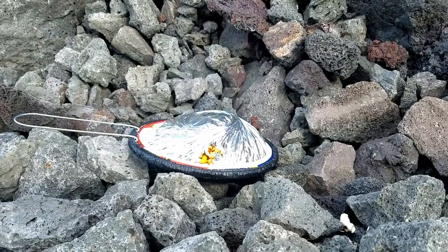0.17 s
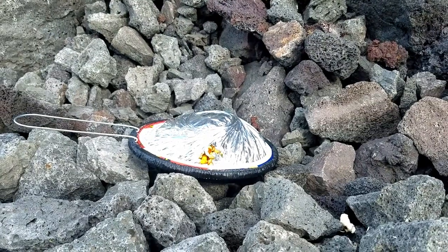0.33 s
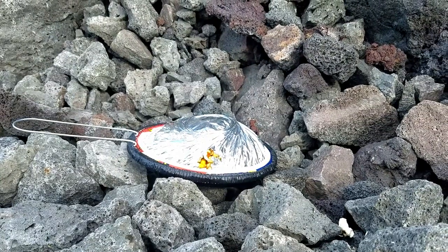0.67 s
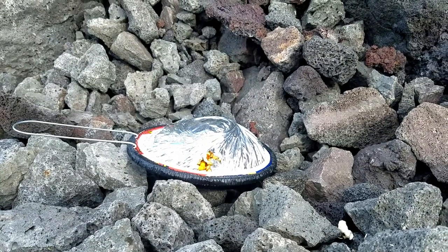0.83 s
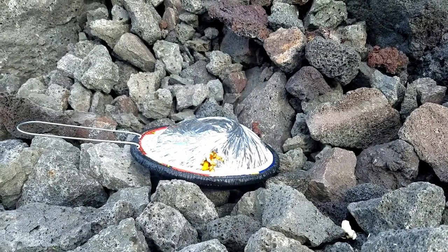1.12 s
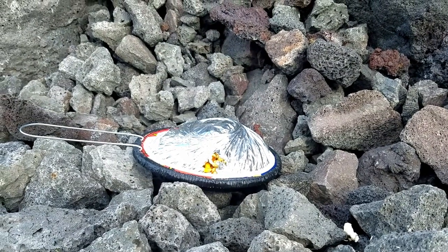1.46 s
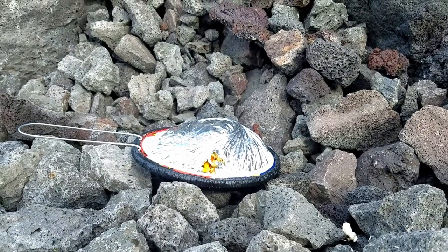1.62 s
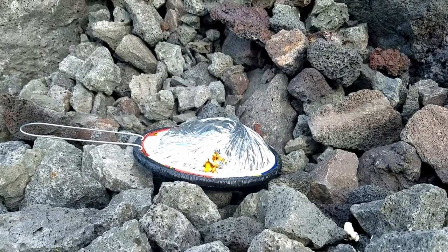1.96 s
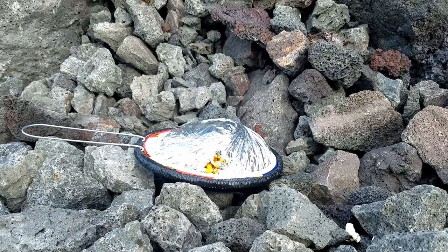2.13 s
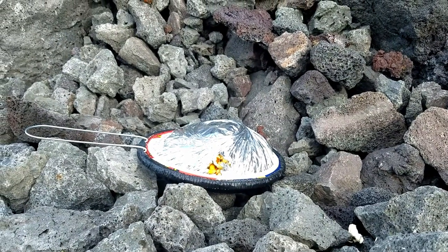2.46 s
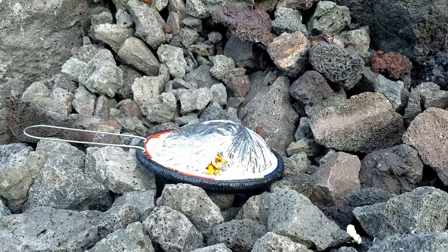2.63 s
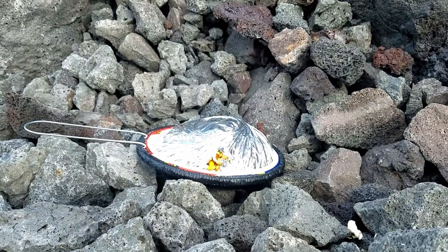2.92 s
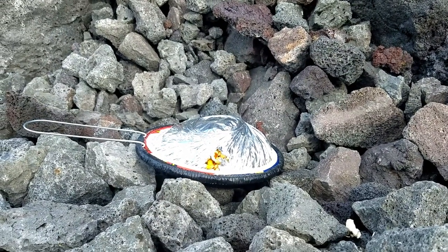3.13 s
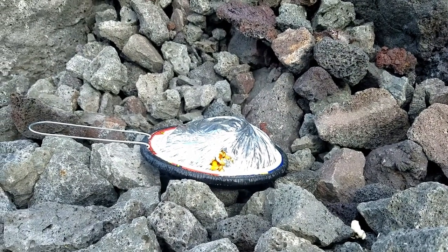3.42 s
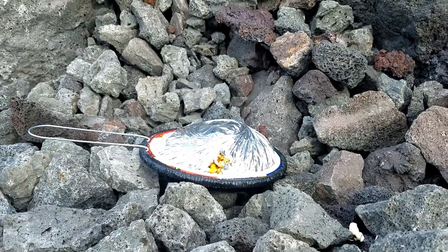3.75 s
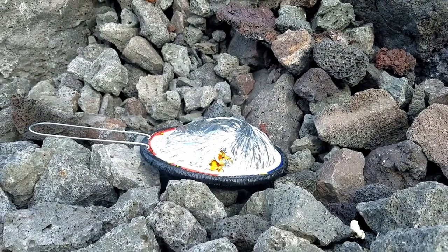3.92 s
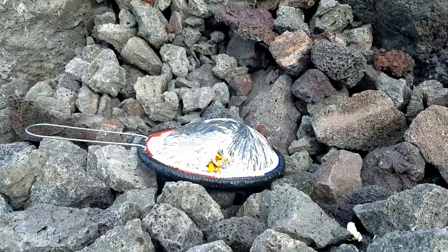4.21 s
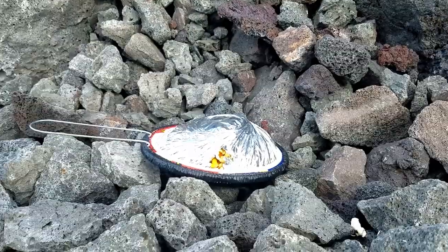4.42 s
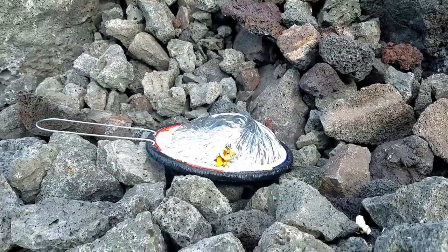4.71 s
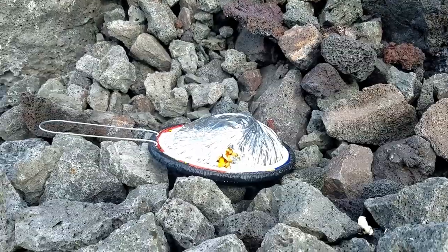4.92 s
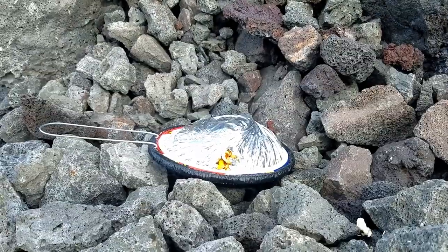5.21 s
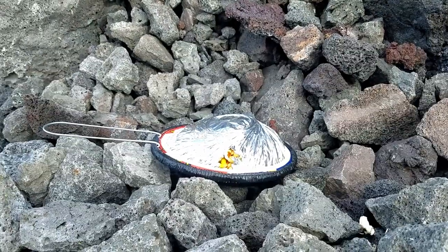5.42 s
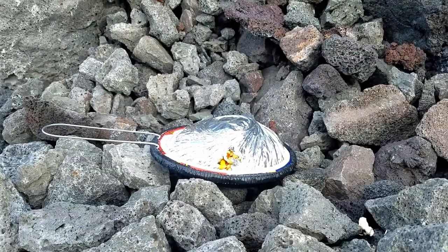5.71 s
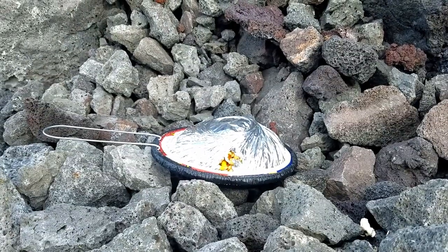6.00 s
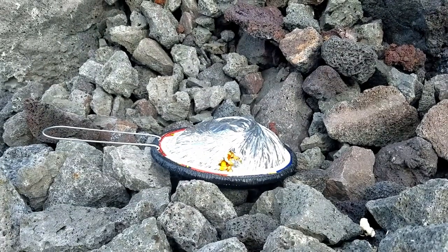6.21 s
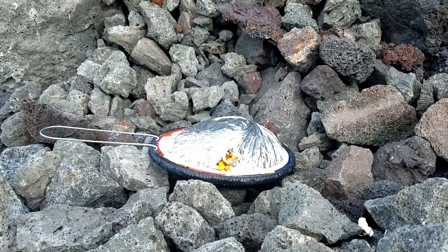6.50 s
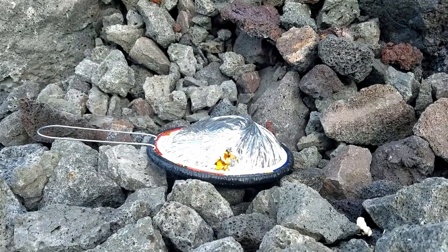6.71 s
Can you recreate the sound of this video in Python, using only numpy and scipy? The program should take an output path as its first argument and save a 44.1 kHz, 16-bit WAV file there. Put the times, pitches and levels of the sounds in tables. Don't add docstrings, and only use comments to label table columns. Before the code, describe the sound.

A foil-covered popcorn pan sits on rocks outdoors. After a quiet second of hiss and faint ticks, a soft pop comes, then a weaker one, then a loud double burst with a long rattle of kernels. Smaller pops follow, a long pause with tiny ticks, then two firm pops and a last one near the end. Close stereo microphone, light uneven wind on it.

```python
import sys
import numpy as np
from scipy import signal
from scipy.fft import rfft, irfft
from scipy.io import wavfile
from scipy.ndimage import uniform_filter1d

SR = 44100
rng = np.random.default_rng(int(sys.argv[2]) if len(sys.argv) > 2 else 0)


def undo_db(level):
    steps = np.asarray(level, float) / 20
    return 10 ** steps


def dump(signal):
    limited = np.clip(np.atleast_2d(signal).T, -1, 1)
    pcm = np.round(limited * 32767).astype(np.int16)
    wavfile.write(sys.argv[1], SR, pcm)


N = 302967

TOP_HZ = 15780
TICK_HZ = 1200
CHANCE_SPREAD_DB = 15

# start_s, level_db, left_right_db
BREEZE = [(0, -70.5, 0), (.15, -60.5, -4), (.7, -70, -12.5), (1.05, -66.5, -3.5), (1.45, -58.5, -10.5),
          (1.9, -67, -8.5), (2.45, -67, -5.5), (3.35, -69.5, -1), (4.2, -65.5, -2), (4.75, -62.5, 0),
          (5.1, -69, 4), (5.55, -58.5, 13.5), (5.85, -63.5, -3), (6.15, -59, 20.5), (6.5, -58, 0.5),
          (6.87, -66, 14.5)]
# start_s, strength_db
SHIFTS = [(0.1462, -44.5), (0.636, -40.5), (1.6563, -48), (1.7334, -40.5), (1.8701, -43), (2.051, -40),
          (2.2268, -42), (2.8095, -41), (2.9333, -39.5), (2.9675, -38), (3.1128, -50.2), (3.2801, -46),
          (3.4203, -43), (3.5506, -47.5), (3.686, -43), (4.1779, -43.2), (4.766, -40), (5.6568, -39),
          (6.3912, -51.2), (6.5855, -38), (6.615, -49)]
# start_s, level_db, t60_s, pitch_hz
PATTER = [
    (.98, -47.5, 0.16, 1310),
    (1.26, -51.5, 0.2, 1390),
    (1.475, -50, 0.65, 1740),
    (2.41, -51.5, 0.21, 1310),
    (2.814, -49, 0.2, 1900),
    (4.814, -59, 0.081, 1500),
    (4.92, -48.5, 0.32, 1190),
    (5.676, -52.5, 0.22, 1980),
    (6.51, -51, 0.27, 990),
]


def evened(x):
    return x / np.sqrt(np.mean(x ** 2) + 1e-20)


def peaked(x):
    return x / abs(x).max()


def read(points, hz):
    f, value = np.transpose(points)
    return np.interp(np.log(hz + 1), np.log(f + 1), value)


def add(mix, s, sound, pan_db):
    part = mix[:, max(round(s * SR), 0):][:, :sound.shape[1]]
    part += sound[:, :part.shape[1]] * undo_db(np.array([[pan_db / 2], [-pan_db / 2]]))


def pair(noise, same):
    same = np.clip(same, -1, 1)
    return np.array([noise[0], same * noise[0] + np.sqrt(1 - same ** 2) * noise[1]])


def coloured(x, db):
    return irfft(rfft(x) * undo_db(db), x.shape[-1])


def burst(t, rise, t60):
    shape = (1 - np.exp(-(t / rise) ** 2)) * undo_db(-60 * t / t60)
    return shape / shape.max()


def field(points_db):
    z = rng.standard_normal((points_db.shape[-1], points_db.shape[-2], 4)).T
    z = (z[:2] + 1j * z[2:]) * undo_db(points_db)
    size = 2 * points_db.shape[-2] - 4
    return signal.istft(z, nperseg=size, noverlap=size * 3 // 4)[1][:, :N]


def pan_rings(hz):
    # pitch_hz, lift_db
    pan_modes = [(1000, 7.5), (1230, 5.5), (1410, -9.5), (1680, 9), (3150, -2), (4050, -6), (4430, 0.5),
                 (5070, -5.5)]
    return sum(db / (1 + ((hz - f) / (0.09 * f)) ** 2) for f, db in pan_modes)


def hiss():
    # pitch_hz, density_db
    hiss_spectrum = [(150, -13), (250, 0), (302, -10.5), (392, 2), (483, -4.5), (695, -4), (1110, -7.5),
                     (1770, -1), (2980, -12), (3790, -12.5), (5090, -18), (6490, -17.5), (9340, -23),
                     (12800, -16), (15700, -16.5)]
    frames, hz = N // 256 + 5, np.fft.rfftfreq(1024, 1 / SR)
    patches = uniform_filter1d(rng.standard_normal((frames, 513)), 10, 0)
    patches = evened(uniform_filter1d(patches, 12, 1)).T
    colour_db = read(hiss_spectrum, hz) + 2.74 / (1 + ((hz - 2200) / 300) ** 2)
    colour_db -= 40 * (hz > TOP_HZ + 120)
    return undo_db(-59) * evened(field(colour_db[:, None] + .6 * patches))


def breeze_db(t):
    # start_s, lift_db, half_length_s
    gust_rows = [(0.19, 3, 0.083), (0.376, 9.5, 0.019), (0.433, 7.5, 0.015), (0.624, 7, 0.026),
                 (0.685, 7, 0.033), (1.24, 2.5, 0.055), (2.028, 10, 0.023), (2.195, 10, 0.042),
                 (2.685, 6.5, 0.034), (3.005, 6.5, 0.075), (3.506, 11.5, 0.032), (3.83, 6, 0.07),
                 (4.223, 8, 0.068), (4.3, 5.5, 0.018), (4.623, 3, 0.012), (5.695, 8.5, 0.024),
                 (6.297, 9, 0.012)]
    s, level_db, _ = np.transpose(BREEZE)
    gusts_db = sum(db * np.exp(-((t - at) / half) ** 2) for at, db, half in gust_rows)
    return np.interp(t, s, level_db) + gusts_db


def wind():
    # pitch_hz, density_db
    gust_spectrum = [(15, -1), (40, 0), (80, -7.5), (150, -6.5), (300, -15), (600, -27.5), (1200, -58),
                     (3000, -120)]
    frames, hz = N // 128 + 5, np.fft.rfftfreq(512, 1 / SR)
    s, _, side_db = np.transpose(BREEZE)
    gust_db = breeze_db((np.arange(frames) - 2) * 128 / SR)
    eddies = evened(uniform_filter1d(rng.standard_normal((frames, 2)), 5, 0)).T[:, None]
    height = np.clip(np.log2((hz[:, None] + 20) / 60) / 2, 0, 1.5)
    lumps_db = (2.3 + 4.0 * height) * np.minimum(eddies, 2)
    lumps_db = lumps_db + 0.48 * height * (gust_db + 44.5)
    rumble = evened(field(read(gust_spectrum, hz)[:, None] + lumps_db))
    t = np.arange(N) / SR
    balance_db = np.array([[.5], [-.5]]) * (np.interp(t, s, side_db) - 1.0)
    return undo_db(breeze_db(t) + 4.0 + balance_db) * rumble


def ticks():
    out, u = np.zeros((2, N)), np.arange(-100, 100) / SR * TICK_HZ
    push = np.cos(2 * np.pi * u - .2) * np.exp(-(u / .5) ** 2)
    for s, db in SHIFTS:
        add(out, s - 100 / SR, undo_db(db) * np.array([push, push]), -2)
    return out


def whines():
    # start_s, length_s, start_hz, end_hz
    whine_rows = [(0.322, .1, 13100, 13300), (0.832, 0.06, 13000, 12800), (1.26, 0.093, 12200, 12600),
                  (1.825, 0.081, 12900, 12600), (2.345, 0.11, 12900, 13200), (3.364, 0.08, 12800, 12900),
                  (3.852, 0.085, 12900, 13000), (4.36, 0.073, 13200, 13300), (4.464, 0.083, 13100, 13300),
                  (4.962, .09, 12900, 13100), (5.37, .09, 13100, 13400), (5.832, 0.13, 13350, 12700),
                  (6.39, .08, 13200, 13200)]
    out = np.zeros((2, N))
    noise = rng.standard_normal((len(whine_rows), 2, 8192))
    for (s, length, start_hz, end_hz), fuzz in zip(whine_rows, noise):
        size = min(round(length * SR), 8192)
        turns = np.cumsum(np.linspace(start_hz, end_hz, size)) / SR
        flutter = .3 + evened(uniform_filter1d(fuzz, 110))[:, :size]
        tone = np.cos(2 * np.pi * turns) * signal.windows.tukey(size, .4)
        add(out, s, undo_db(-71.0) * flutter * tone, 0)
    return out


def thumps():
    # start_s, strength_db, pitch_hz, left_right_db
    thump_rows = [(0.58, -53, 161, -16), (0.592, -51, 278, -16), (0.602, -52, 220, -17),
                  (0.623, -45, 400, -13), (.674, -50.5, 165, -16), (3.136, -49.5, 355, -13),
                  (3.564, -48.5, 403, -7), (3.876, -53, 204, 19), (6.022, -55, 189, 22), (6.1, -65, 156, 9),
                  (6.161, -46, 268, 19.5), (6.294, -51, 268, 18), (6.321, -52, 363, 19)]
    out, t = np.zeros((2, N)), np.arange(-700, 700) / SR
    for s, db, pulse_hz, pan_db in thump_rows:
        turn = 2 * np.pi * pulse_hz * t + np.array([[.5], [2.2]])
        pulse = np.cos(turn) * np.exp(-(t * pulse_hz / 1.1) ** 2)
        add(out, s - 500 / SR, undo_db(db - 2.0) * pulse, pan_db)
    return out


def tumbles():
    chance = rng.standard_normal((len(PATTER), 10, 4))
    s, db, t60, _ = np.transpose(PATTER)[:, :, None]
    after = np.cumsum(0.0059 * np.exp(0.37 * chance[..., 0]), 1)
    strength_db = db - .5 * 60 * after / t60
    strength_db = strength_db - 0.5 * np.clip(chance[..., 1], -2, 1.5)
    return (s + after).ravel(), strength_db.ravel(), *chance[..., 2:].reshape(-1, 2).T


def all_crinkles(tumbling):
    # start_s, strength_db, brightness_db, left_right_db
    crack_rows = [(.9768, -27.5, -0.5, 6), (.9842, -31, -3, 1), (1.2514, -35, -4.5, 18),
                  (1.2541, -39, -3, -24), (1.265, -36.5, -23, 10), (1.4167, -13, 0.5, -4),
                  (1.4248, -15, -2, 1), (1.4288, -34, -9, 5), (1.4613, -11.5, -5.5, -1),
                  (1.464, -14.5, -13, 4), (1.4678, -10.5, -7.5, 5), (1.471, -26.5, -2, -12),
                  (2.3943, -25.5, -5, 5), (2.4025, -31.5, -9, 21), (2.4076, -37.5, -7, -26),
                  (2.8143, -23, 4, -3), (2.817, -43, 8, -8), (2.8275, -30.5, 11, 0), (4.8076, -22.5, -2, 2),
                  (4.811, -37, -13, 8), (4.816, -32.5, -2, 2), (4.9053, -13.5, -3, -1),
                  (4.9119, -20.5, -6, 12), (4.9168, -25.5, -21, -9), (5.6776, -38, 4, 0),
                  (5.6928, -44.5, -1, 0), (5.6958, -33.5, -2, 1), (6.5, -17, 1, 0), (6.5042, -19, -16.5, 4),
                  (6.5068, -29, 1, -4)]
    # start_s, strength_db, brightness_db
    crinkle_rows = [(0.972, -31, -18), (0.99, -38, -7), (1.4395, -31, -7), (1.4795, -33, -11),
                    (1.506, -36, -22), (1.5287, -36, -24), (1.572, -42, -13), (1.602, -44, 3),
                    (1.62, -46.5, -5), (1.641, -45.5, 10), (2.2835, -53, 15), (2.844, -36, -1),
                    (2.8617, -52, 1), (2.8872, -42, 1), (4.6237, -50, 2), (4.8395, -39, -6),
                    (4.933, -41, 11), (4.973, -46, -30), (5.655, -40.5, 0)]
    side_db = 7
    s, db, where, sway = tumbling
    bright_db = -3 + CHANCE_SPREAD_DB * np.tanh(where)
    creases = zip(s, db + 1.5, bright_db, side_db * (1 + sway))
    return crack_rows + [(*row, side_db) for row in crinkle_rows] + list(creases)


def crinkles(rows):
    # pitch_hz, level_db
    foil_spectrum = [(1800, -7.5), (2800, 3), (4200, 5.5), (5500, -2.5), (9000, -11), (12500, -7),
                     (15500, -16.5)]
    out, t = np.zeros((2, N)), np.arange(2048) / SR
    hz = np.fft.rfftfreq(2048, 1 / SR)
    noise = rng.standard_normal((len(rows), 2, 2048))
    noise *= undo_db(1.8 * np.minimum(rng.exponential(1, noise[:, :1].shape), 4))
    after = np.maximum(t - .003, 0)
    lag = np.exp(-2j * np.pi * hz * np.array([[.0037], [.0037 - 1.5 / SR]]))
    for (s, db, bright_db, pan_db), fizz in zip(rows, noise):
        soft = np.clip(-(db + 23.5) / 30, 0, 1)
        creak = undo_db(-39.0) * burst(t, 0.0043, 0.04)
        rustle = undo_db(-8.5) * burst(after, 0.0019, 0.024 + 0.095 * soft)
        shape = creak + burst(after, 0.00053, 0.0062) + rustle
        colour_db = read(foil_spectrum, hz) + pan_rings(hz)
        colour_db = colour_db + (bright_db + 3.0) * 1.22 / (1 + (7000 / (hz + 1)) ** 6)
        snap = (.9 - 0.85 * soft) * peaked(irfft(undo_db(colour_db) * lag, 2048))
        crackle = 0.28 * evened(coloured(pair(fizz, 0.33), colour_db)) * shape
        add(out, s - .0038, undo_db(db + 2.5) * np.tanh(snap + crackle), pan_db)
    return out


def rings(rows, rise_s, fall_s, skew):
    out, t = np.zeros((2, N)), np.arange(-200, 500) / SR
    shape = np.where(t < 0, np.exp(-(t / rise_s) ** 2), 1 / np.cosh(t / fall_s))
    chance = rng.standard_normal((len(rows), 2))
    for (s, db, ring_hz, *pan_db), (turn, apart) in zip(rows, chance):
        angle = 2 * np.pi * (ring_hz * t + turn) + skew * apart * np.array([[.5], [-.5]])
        add(out, s - 200 / SR, undo_db(db) * shape * np.cos(angle), sum(pan_db))
    return out


def struck_modes():
    # start_s, strength_db, pitch_hz, left_right_db
    panel_rows = [(0.975, -34.5, 1600, -8), (0.9782, -34, 1810, -7), (0.9837, -34, 1650, 1),
                  (0.9864, -32, 1700, 4), (0.9917, -32.5, 1830, -7), (1.2545, -25.5, 1300, 0),
                  (1.2582, -27, 960, -6), (1.4195, -14, 1690, -3), (1.4332, -22, 920, 1),
                  (1.462, -15, 1050, 3), (1.4642, -16, 1450, -7.5), (1.4692, -27, 1960, -12),
                  (2.3952, -31.5, 1230, 0), (2.402, -29, 1330, 0), (2.4047, -38, 1400, -4),
                  (2.4085, -22.5, 1270, -2), (2.4157, -31, 1260, -3), (2.8172, -44, 1280, 6),
                  (2.8195, -42, 1740, 7), (2.8242, -41, 1270, 8), (2.8282, -42, 1800, -9),
                  (2.8437, -40, 1900, -7), (4.804, -34, 940, -1), (4.8042, -35, 1720, -4),
                  (4.808, -23, 1190, -1), (4.8087, -26.5, 1920, -6), (4.8125, -27, 1400, -1),
                  (4.9057, -22, 1680, -6), (4.9092, -23, 1450, 4), (4.915, -24, 1770, -18),
                  (5.6789, -43, 1280, -3), (5.6959, -35.5, 940, 1), (5.7009, -39, 1820, -9),
                  (5.7049, -41, 1020, 4), (5.7064, -39, 1700, -1), (6.503, -23.5, 1540, 0),
                  (6.5065, -28, 1940, -2), (6.5154, -26.5, 1470, 0)]
    # start_s, strength_db, pitch_hz, left_right_db
    crease_rows = [(0.977, -38, 4600, 8), (0.9772, -42, 6960, -1), (0.9844, -41, 3460, 7),
                   (1.2547, -35.5, 3370, 17), (1.2649, -46, 3750, 7), (1.417, -22, 4370, 12),
                   (1.4617, -29, 3070, 5), (1.4637, -19, 4050, 3), (1.464, -18, 3030, 5),
                   (1.4687, -15, 3920, -6), (2.3945, -47, 2950, 2), (2.4, -36, 3420, -8),
                   (2.4025, -31, 6670, 2), (2.4057, -39, 3500, 5), (2.8142, -32, 4800, -12),
                   (2.815, -45, 2840, -6), (2.8177, -36, 2670, -8), (2.819, -37, 4020, -13),
                   (4.8107, -39, 4640, 16), (4.811, -24, 2500, 5), (4.9057, -26.5, 6050, -1),
                   (4.9057, -28, 3000, 7), (4.912, -20.5, 3600, 5), (4.915, -34, 6360, 0),
                   (4.9152, -30, 11900, -2), (4.974, -45, 3970, 2), (5.6769, -44, 4800, 7),
                   (5.6774, -39, 6030, 5), (6.5017, -27, 2730, -5), (6.5077, -45, 3530, -5)]
    # start_s, strength_db, pitch_hz
    boom_rows = [(0.9797, -36.5, 820), (0.9877, -35.5, 795), (0.9912, -40, 610), (0.9989, -42, 580.0),
                 (1.2624, -38, 740), (1.2649, -37, 375), (1.42, -16, 460), (1.4305, -34, 510),
                 (1.4625, -23, 424), (1.4722, -27.5, 567), (1.4769, -34, 540), (2.394, -36, 550),
                 (2.41, -31.5, 500), (2.8274, -39, 856), (2.8319, -42, 656), (2.8374, -41.5, 390.0),
                 (2.8429, -39.5, 627), (4.809, -32, 527), (4.8125, -34, 810), (4.8177, -42, 714),
                 (4.911, -22.5, 585), (5.6572, -43, 473), (5.6777, -41.5, 430.0), (5.7016, -42, 524),
                 (5.7081, -39.5, 660), (6.501, -19.5, 530), (6.5065, -29.5, 1000), (6.511, -37, 590),
                 (6.5169, -30, 520.0)]
    # start_s, strength_db, pitch_hz
    rebound_rows = [(1.0085, -54, 620.0), (1.009, -52, 1920.0), (1.0205, -46, 520.0), (1.0215, -53, 1720.0),
                    (1.4533, -47, 11800), (1.4867, -37, 520.0), (1.4952, -39, 1120.0),
                    (1.5054, -38, 1420.0), (1.5057, -55, 3620.0), (1.5142, -47, 1290.0),
                    (1.5189, -40, 1700), (1.5286, -50, 4220.0), (1.5301, -37, 1540), (1.5366, -43, 1100.0),
                    (1.5421, -36.5, 880.0), (1.5496, -49, 1460.0), (1.5568, -43, 1550.0),
                    (1.5656, -57, 1400.0), (1.5743, -37.5, 1270), (1.593, -41, 920), (1.5972, -46, 1240),
                    (1.6212, -44, 1100.0), (1.6329, -42, 855), (2.4307, -50, 1250.0), (2.4402, -52, 1770.0),
                    (2.4447, -43, 1770.0), (2.4552, -49, 1070), (2.4863, -42.5, 1510.0),
                    (2.851, -48, 1590.0), (2.8682, -44, 950.0), (2.8879, -45.5, 686), (2.8882, -45, 1840),
                    (4.8255, -52, 1350), (4.8417, -52, 1960.0), (4.9225, -34, 875), (4.9332, -35.0, 1260),
                    (4.9407, -45, 1080.0), (4.9494, -35, 1460), (4.9572, -43, 540.0), (4.9646, -43, 900.0),
                    (4.9739, -34, 1300), (4.9876, -40, 696), (4.9926, -40.5, 1470), (5.7212, -43, 1490),
                    (5.7394, -47, 1620), (6.529, -44, 580.0), (6.5385, -39, 1020),
                    (1.063, -48, 800),
        (1.075, -53, 750),
        (1.0865, -52, 750),
        (1.1238, -49, 1040),
        (5.73, -44, 1300),
    ]
    # start_s, strength_db, pitch_hz, left_right_db
    rim_rows = [
        (2.2835, -55, 15000, 14),
        (2.3945, -41, 15000, 3),
        (5.6772, -43, 7600, -5),
    ]
    out = rings(panel_rows, 0.00096, 0.0005, 0.61)
    out += rings(crease_rows, 0.00036, 0.00045, 1.35)
    out += rings(boom_rows, 0.0019, 0.001, .1)
    out += rings(rebound_rows, 0.00049, 0.00068, 0.3)
    return out + rings(rim_rows, .0003, 0.00044, 1.0)


def all_blows(tumbling):
    # start_s, strength_db, patch_hz, boom_db
    blow_rows = [(.976, -38, 1570, -19), (.9839, -26, 1340, 0), (.9863, -45, 1430, -9),
                 (1.2523, -27.5, 1280, 1.5), (1.2539, -18, 1400, -32), (1.2573, -29.5, 1020, -17),
                 (1.4171, -14.5, 1630, -9), (1.4198, -15, 1690, -1.5), (1.4337, -19, 1030, -15),
                 (1.4628, -16, 1290, -21), (1.4651, -15, 1460, -9), (2.395, -20.5, 1370, -6),
                 (2.4009, -16.5, 1400, -26), (2.4044, -16.5, 1400, -24), (2.4073, -24.5, 1360, -4.5),
                 (2.4154, -23, 1260, -23), (2.8215, -39, 1720, -5), (2.8255, -37.5, 1280, -9),
                 (4.805, -28, 1390, -23), (4.8082, -28, 1460, -7), (4.8129, -23, 1760, -7.5),
                 (4.9066, -32, 1600, -20), (4.909, -33, 1450, 5), (4.9153, -15, 1590, -8.5),
                 (5.679, -36, 1400, 2), (5.696, -30.5, 1180, -6), (6.4988, -25, 1400, 4.5),
                 (6.5005, -18.5, 1320, 2), (6.5026, -18, 1520, -18), (6.506, -22.5, 1390, -17)]
    s, db, where, sway = tumbling
    patch_hz = 1400 * np.exp(0.18 * np.tanh(where))
    light = zip(s, db - 3.5, patch_hz, -5.5 + CHANCE_SPREAD_DB * np.tanh(sway))
    hard = [(at, db - 7, hz, boom_db - 5.5) for at, db, hz, boom_db in blow_rows]
    shifting = [(at + 0.00196, db - 9, TICK_HZ, -8) for at, db in SHIFTS]
    return hard + shifting + list(light)


def blows(rows):
    # pitch_hz, width_hz, level_db
    dome_modes = [(418, 130, 13), (497, 59, 10), (699, 71, 21.5)]
    out, t = np.zeros((2, N)), np.arange(2048) / SR
    hz = np.fft.rfftfreq(2048, 1 / SR)
    dome = sum(undo_db(db) / np.sqrt(1 + (2 * (hz - f) / w) ** 4) for f, w, db in dome_modes)
    dome_db = 20 * np.log10(dome)
    noise = rng.standard_normal((len(rows), 2, 2, 2048))
    for (s, db, patch_hz, boom_db), (shake, sway) in zip(rows, noise):
        u = (t - .002) * patch_hz
        push = np.cos(2 * np.pi * u - .6) * np.exp(-(u / 0.73) ** 2)
        hard = np.clip((db + 57.0) / 20, .15, 1)
        near_db = -14 * np.log2((hz + 30) / patch_hz) ** 2 + pan_rings(hz)
        rattle = coloured(pair(shake, 0.86), near_db) * burst(t, 0.00028, .05 - 0.015 * hard)
        boom = coloured(pair(sway, 0.97), dome_db) * burst(t, 0.0009, 0.012 + 0.057 * hard)
        blow = (1.2 - 0.77 * hard) * push + hard * peaked(rattle)
        blow = blow + undo_db(boom_db + 3.5) * peaked(boom)
        add(out, s - .002, undo_db(db) * blow, -1.2)
    return out


def jolts():
    # start_s, strength_db
    jolt_rows = [
        (0.98, -50),
        (1.254, -56),
        (1.421, -49),
        (1.465, -56),
        (2.402, -42.5),
        (2.82, -43.5),
        (4.811, -54.5),
        (4.91, -44),
        (5.694, -44),
        (6.502, -41),
    ]
    out, u = np.zeros((2, N)), (np.arange(1500) / SR - .004) * 137
    push = peaked(np.sin(2 * np.pi * u) * np.exp(-(u / 0.27) ** 2))
    for s, db in jolt_rows:
        add(out, s - .004, undo_db(db) * np.array([push, push]), 0)
    return out


def settling():
    out, t = np.zeros((2, N)), np.arange(16384) / SR
    hz = np.fft.rfftfreq(16384, 1 / SR)
    noise = rng.standard_normal((len(PATTER), 3, 16384))
    for (s, db, t60, patter_hz), grains in zip(PATTER, noise):
        clumps = undo_db(4.2 * evened(uniform_filter1d(grains[2], 200)))
        colour_db = -7 * np.log2((hz + 30) / patter_hz) ** 2 + pan_rings(hz)
        patter = evened(coloured(pair(grains, 0.46), colour_db))
        add(out, s, undo_db(db) * patter * clumps * burst(t, 0.0024, t60), 0)
    return out


def snaps():
    # start_s, strength_db, direction (outward 1, inward -1)
    snap_rows = [(1.416, -15, 1), (1.4638, -11.5, -1), (1.4953, -40, 1), (1.5206, -34, 1), (2.3942, -22, 1),
                 (2.8136, -32, 1), (2.8276, -26, 1), (2.8632, -41, 1), (2.8875, -35.5, 1), (4.8033, -38, 1),
                 (4.8072, -18, 1), (4.9056, -10.5, 1), (5.676, -42, 1)]
    out = np.zeros((2, N))
    lag_s, width_s = .00004, .00006
    u = (np.arange(-30, 60) / SR - np.array([[0], [lag_s]])) / width_s
    spike = np.exp(-u ** 2 / 2) - .5 * np.exp(-(u - 3) ** 2 / 8)
    for s, db, way in snap_rows:
        add(out, s - 30 / SR, np.sign(way) * undo_db(db) * spike, -1)
    return out


def rocks(x):
    # pitch_hz, t60_s
    rock_decay = [(200, 0.14), (1000, 0.17), (4000, 0.013), (12000, 0.059)]
    taps = np.zeros((2, SR // 3))
    jitter = rng.integers(0, 40, (2, (SR // 3 - 121) // 40))
    at = np.arange(120, SR // 3 - 40, 40) + jitter
    np.put_along_axis(taps, at, rng.choice([-1., 1.], at.shape), 1)
    hz, t, z = signal.stft(taps, SR, nperseg=256)
    t60 = np.maximum(read(rock_decay, hz), .01)[:, None]
    tail = signal.istft(z * undo_db(-60 * t / t60), SR, nperseg=256)[1]
    return signal.fftconvolve(x, tail / np.linalg.norm(tail[0]), axes=1)[:, :N]


def scene():
    tumbling = tumbles()
    pan = ticks() + crinkles(all_crinkles(tumbling)) + struck_modes()
    pan += blows(all_blows(tumbling)) + settling() + snaps()
    air = hiss() + wind() + whines() + thumps()
    return pan + undo_db(-16.5) * rocks(pan) + jolts() + air


def roll_off(x):
    return signal.sosfilt(signal.butter(12, 15780, fs=SR, output="sos"), x)


def record(dry):
    heard = signal.lfilter(*signal.butter(2, 38, "high", fs=SR), dry)
    heard = signal.sosfilt(signal.cheby2(10, 60, 17100, fs=SR, output="sos"), heard)
    return roll_off(heard - .0008)


dry = scene()
out = record(dry)
dump(out)
```